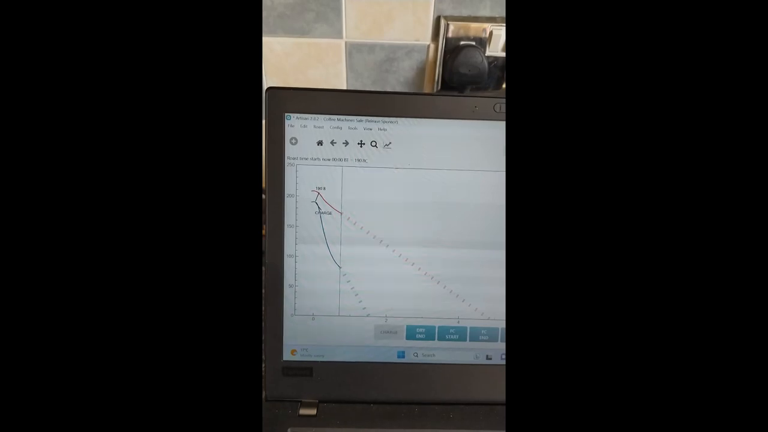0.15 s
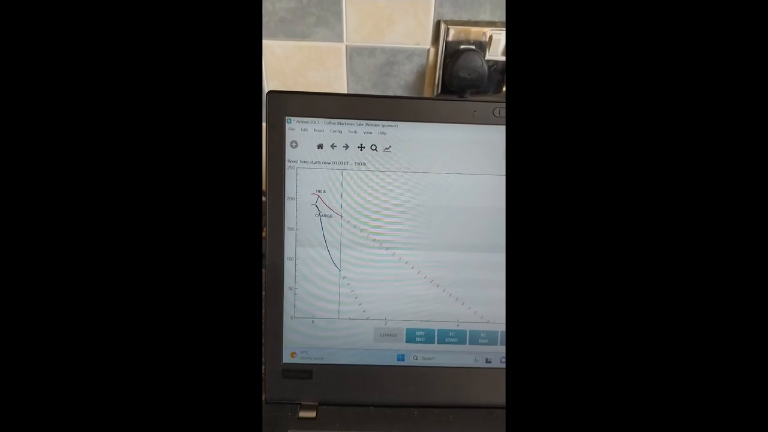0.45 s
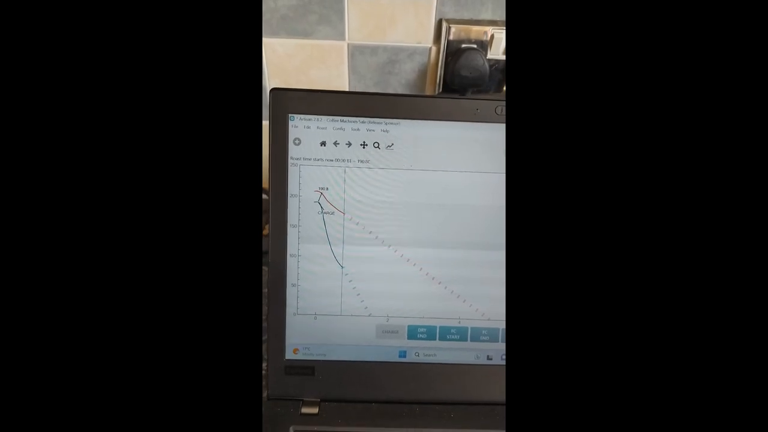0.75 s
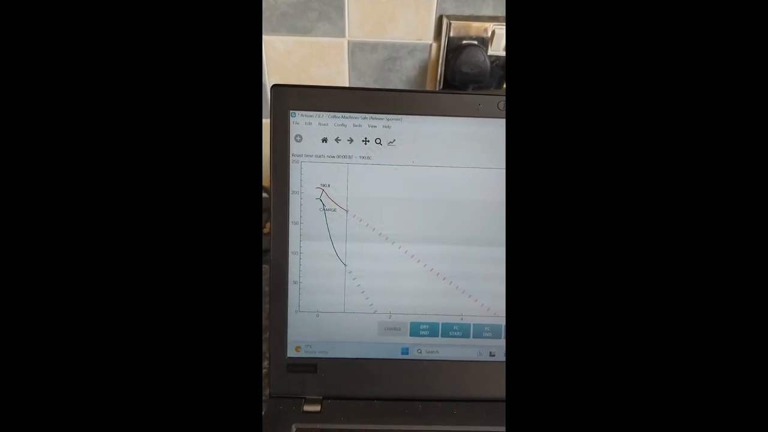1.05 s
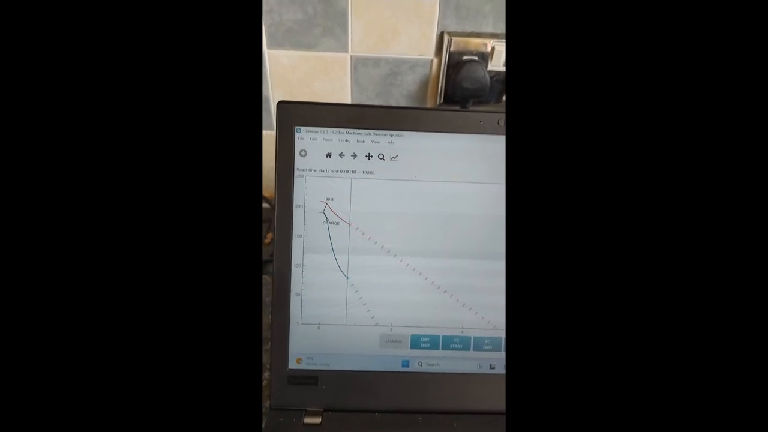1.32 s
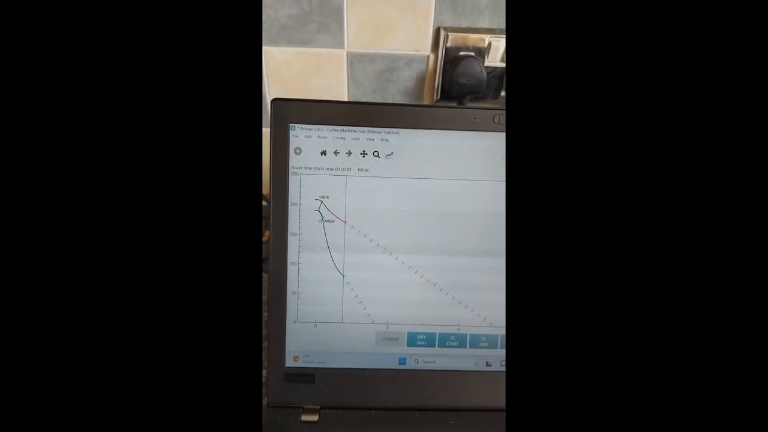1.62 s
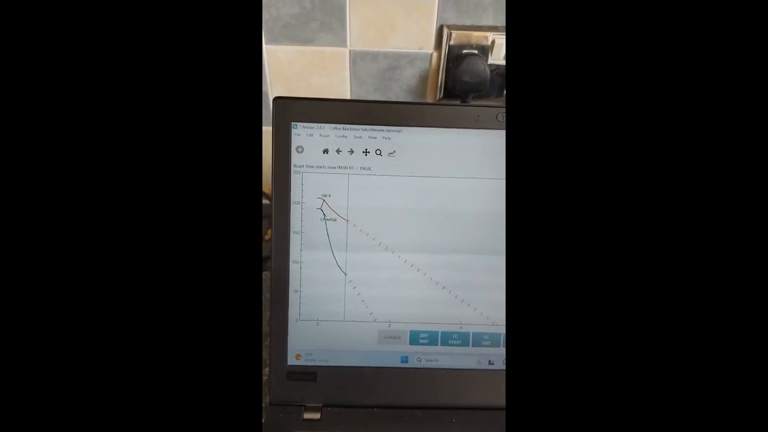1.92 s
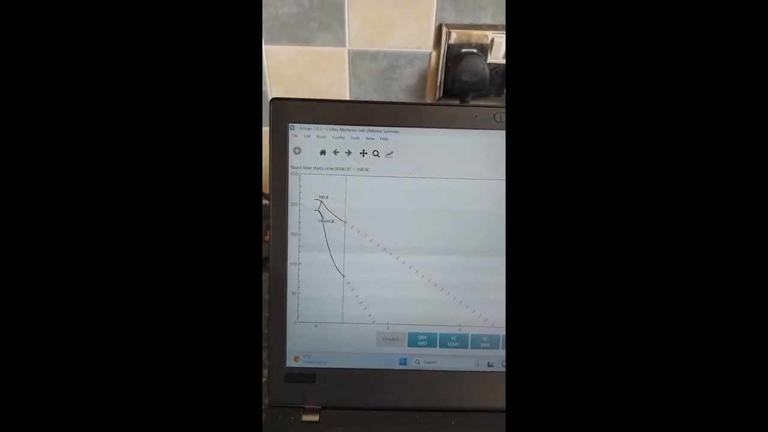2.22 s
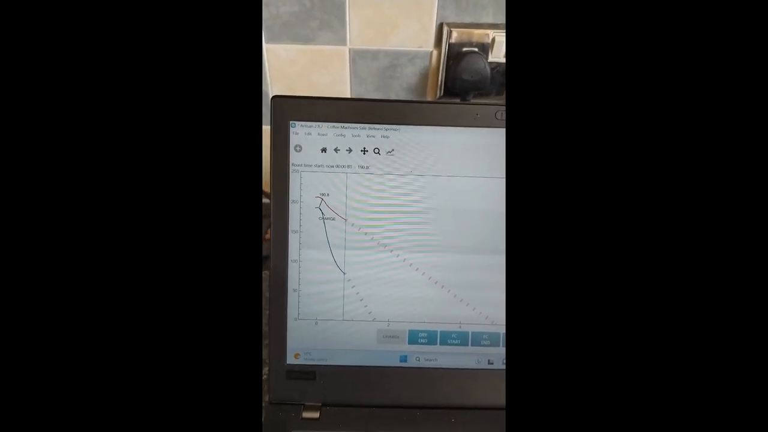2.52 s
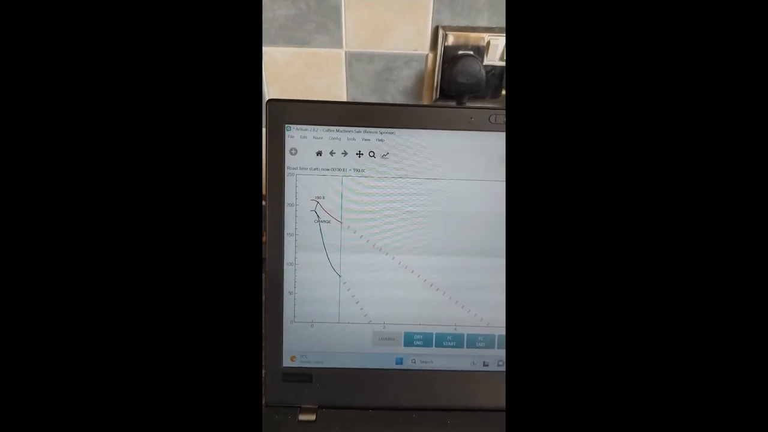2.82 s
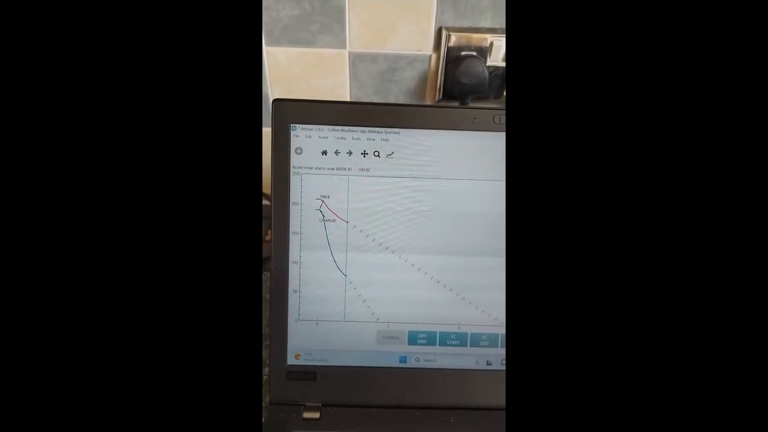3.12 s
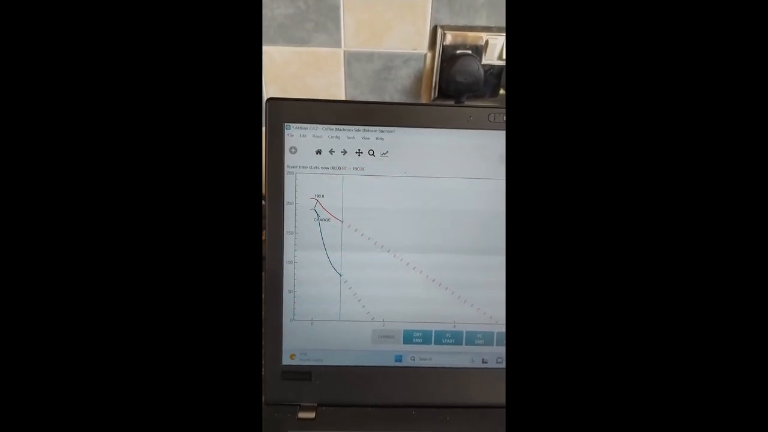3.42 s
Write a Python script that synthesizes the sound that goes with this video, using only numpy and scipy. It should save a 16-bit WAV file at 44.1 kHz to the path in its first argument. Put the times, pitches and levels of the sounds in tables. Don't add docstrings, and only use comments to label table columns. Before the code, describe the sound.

A small roasting drum turns throughout, about 3.5 seconds, already running and never stopping. Bright, dense bean rattles build and quickly fall away every 0.4 seconds, fullest around 1.2 to 1.8, over continuous sliding rustle. Heavier clumps land near 0.25, 0.6, 3.0 and 3.35; sharp steel ticks and tiny high rings scatter throughout. Low, soft fan air with a faint wavering tone sits beneath, in a short bright tiled-room tail.

```python
import sys
import numpy as np
from scipy import signal
from scipy.fft import rfft, irfft
from scipy.io import wavfile

SR = 44100
rng = np.random.default_rng(int(sys.argv[2]) if len(sys.argv) > 2 else 0)


def file_out(sig):
    cols = np.atleast_2d(sig).T
    lim = np.clip(cols, -1, 1)
    pcm = np.round(lim * 32767).astype(np.int16)
    wavfile.write(sys.argv[1], SR, pcm)


def ratio_of_db(decibels):
    return 10 ** (np.asarray(decibels, float) / 20)


N = 156555


def unit(x):
    return x / np.sqrt(np.mean(x ** 2) + 1e-20)


def at_hz(points, hz, axis=1):
    points = np.array(points)
    return np.interp(np.log(hz + 1), np.log(points[:, 0]), points[:, axis])


def colour(x, gain):
    return irfft(rfft(x) * gain(np.arange(N // 2 + 1) * SR / N), N)


def drift(rate):
    r = np.exp(-80 * np.pi * rate / SR)
    slow = signal.lfilter([1], [1, -2 * r, r * r], rng.standard_normal(N // 40 + 2002))[2000:]
    return np.interp(np.arange(N) / 40, np.arange(len(slow)), unit(slow))


def resonate(x, hz, width_hz):
    r = np.exp(-np.pi * width_hz / SR)
    top = np.array([1, 0, -1]) * (1 - r * r) / 2
    return signal.lfilter(top, [1, -2 * r * np.cos(2 * np.pi * hz / SR), r * r], x + 1e-18)


# [f/Hz, density/dB per Hz]
AIR = [(22, -5), (60, -9), (88, -13.5), (240, -7.5), (330, -4), (800, 1), (1000, -9.5), (1300, -4.5)]
# [f/Hz, width/Hz, level/dB]
HOUSING = [(156.5, 62, -65.5), (303, 29, -64.5), (388, 125, -64), (461, 55, -62.5), (640, 79, -61),
           (859, 66, -61), (1590, 270, -55)]


def fan_air():
    white = rng.standard_normal((2, N))
    rush = colour(white, lambda hz: ratio_of_db(at_hz(AIR, hz) - 6.6 * np.log2(np.maximum(hz / 1300, 1))))
    air = ratio_of_db(-46 + 0.72 * drift(13)) * unit(rush)
    for hz, width_hz, db in HOUSING:
        hum = resonate(resonate(white, hz, width_hz), hz, width_hz)
        air += ratio_of_db(db + 1.8 * drift(4.6)) * unit(hum)
    return air


# [f/Hz, level/dB]
BLADES = [(574.5, -58), (1722, -56)]


def fan_blades():
    turns = np.cumsum(1 + 0.00092 * drift(3.0)) / SR
    tones = np.zeros(N)
    for hz, db in BLADES:
        tones += ratio_of_db(db + 2 * drift(12.0)) * np.sqrt(2) * np.sin(2 * np.pi * hz * turns)
    return tones


# [f/Hz, correlation]
LIKENESS = [(60, 0.3), (180, 0.75), (550, 0.48), (1650, -0.23), (4970, 0.04), (15000, -0.05)]


def fan():
    def likeness(hz):
        return np.clip(at_hz(LIKENESS, hz), -1, 1)

    air = fan_air()
    mid = colour(air[0], lambda hz: np.sqrt(1 + likeness(hz)))
    side = colour(air[1], lambda hz: np.sqrt(1 - likeness(hz)))
    return mid + side * np.array([[1], [-1]]) + fan_blades()


# [t/s, f/Hz, level/dB, length/s, left-right/dB]
RINGS = [(.565, 9290, -27, 0.021, 11), (.61, 9290, -32, .015, 4), (0.732, 7150, -29.5, 0.02, 19),
         (1.04, 7180, -30, 0.026, 12), (1.13, 7110, -39, 0.018, 9), (1.4, 6330, -39, .02, 4),
         (1.737, 9290, -26, 0.023, 12), (2.248, 7150, -29, 0.017, 13), (2.57, 8600, -29, 0.024, 15),
         (2.694, 7110, -28, 0.016, 16), (2.9, 9290, -30, .025, 2), (3.339, 6720, -32, .02, 17),
         (3.382, 7150, -28, 0.019, 14), (3.399, 9690, -25, 0.028, -2), (2.633, 2120, -41.5, .05, 4),
         (0.605, 870, -40, 0.024, -7), (2.7, 640, -38.5, 0.016, -4)]


def rings():
    fade_s = 0.021
    t, out = np.arange(N) / SR, np.zeros((2, N))
    for s, hz, db, length, pan_db in RINGS:
        shape = np.clip(np.minimum(t - s, s + length - t) / fade_s + .5, 0, 1)
        sides = ratio_of_db(db + np.array([[.5], [-.5]]) * pan_db)
        out += sides * shape * np.sqrt(2) * np.sin(2 * np.pi * hz * t)
    return out


# [t/s, peak level/dB, left-right/dB]
TICKS = [(0.121, -5, 3.5), (0.2328, -18, 4.0), (0.4318, -10, 4.0), (0.5155, -19, 2), (0.6114, -12, 1),
         (0.6294, -22, 2.0), (1.3143, -10, 5.0), (1.6585, -12, 3.5), (1.8334, -6, 3.5), (1.8616, -8, 5.0),
         (2.1007, -5, 3.0), (2.242, -6, 3.5), (2.555, -13, 4.5), (2.7845, -4, 4.0), (2.98, -3, 5),
         (3.212, -18, 3.0), (3.294, -11, 3.5), (3.2984, -8, 3.0), (3.3861, -7, 3.5)]


def ticks():
    level_db, loudest_db, ring_hz, width_hz = -7, -10, 7900, 1200
    out = np.zeros((2, N))
    for s, db, pan_db in TICKS:
        out[:, int(s * SR)] = ratio_of_db(min(db, loudest_db) + level_db + np.array([.5, -.5]) * pan_db)
    return resonate(out, ring_hz, width_hz) * SR / (np.pi * width_hz) + 0.24 * out


def room(x, count=8):
    t60_s, room_db, left_lag_s = 0.14, 10, .00018
    path_s = .06
    t, out = np.arange(SR // 2) / SR, 0
    place = np.arange(N) / SR / path_s
    for k in range(count):
        tail = rng.standard_normal((2, len(t))) * ratio_of_db(-60 * t / t60_s) * (t > .001)
        tail *= ratio_of_db(room_db) / np.sqrt(np.sum(tail ** 2, axis=1, keepdims=True))
        away = np.abs((place - k + count / 2) % count - count / 2)
        fed = x * np.cos(np.pi / 2 * np.minimum(away, 1))
        out = out + irfft(rfft(fed) * rfft(tail, N), N)
    direct = np.array([np.roll(x, int(left_lag_s * SR)), x])
    return (direct + out) / np.sqrt(1 + ratio_of_db(2 * room_db))


# [f/Hz, width/Hz, left depth/dB, right depth/dB]
THIN_BANDS = [(2560, 71, 3, -8), (3280, 300, 7, 4), (3524, 187, 14.5, 14), (4610, 100, -1, 5),
              (5050, 230, 10, -6), (5370, 190, 14, -1), (5960, 140, 10, -9), (6160, 130, 1, 5),
              (2900, 170, 0, 6), (4170, 134, -8, 0), (9340, 170, 8, -9), (10690, 500, 10, 11),
              (11180, 250, -1, -4), (11850, 480, 13, -4), (12200, 440, 8, 9), (14000, 250, 3, 9),
              (13250, 200, 0, 2), (13400, 320, 1, 10), (14500, 600, 5, 20)]
# [t/s, length/s, f/Hz]
DEEP_DIPS = [(.08, .12, 11850), (.13, .05, 14350), (.3, .1, 10700), (.4, .2, 12150), (.58, .04, 3200),
             (.82, .08, 11850), (.82, .08, 12150), (.85, .03, 3200), (1.19, .04, 11850), (1.27, .03, 2900),
             (1.05, .06, 2620), (1.5, .08, 11850), (1.62, .04, 3200), (1.68, .1, 12150), (1.72, .04, 11250),
             (1.6, .05, 14350), (1.975, .06, 2900), (1.975, .06, 3200), (2.0, .04, 5000), (2.05, .08, 5850),
             (2.29, .04, 6150), (2.3, .025, 2900), (2.32, .04, 5000), (2.355, .045, 3500), (2.47, .05, 5850),
             (2.66, .04, 5380), (2.74, .06, 3200), (2.76, .025, 2620), (2.925, .03, 3200), (2.94, .1, 5380),
             (2.95, .06, 5000), (3.0, .12, 3500), (2.9, .08, 12150), (2.9, .06, 11250), (3.135, .03, 3200),
             (3.165, .04, 5000), (3.12, .05, 11850), (3.23, .06, 4550), (3.26, .04, 2620), (3.36, .06, 5380),
             (3.37, .06, 10700), (3.36, .1, 14350)]


def thin_out(x):
    flicker_db, flicker_per_s, own_share, closed_db = 7, 9, .4, 18
    t = np.arange(N) / SR
    for hz, width_hz, *depth_db in THIN_BANDS:
        common = drift(flicker_per_s)
        own = np.array([drift(flicker_per_s), drift(flicker_per_s)])
        swing = common + own_share * own
        closed = np.zeros(N)
        for s, length, at in DEEP_DIPS:
            if abs(at / hz - 1) < .012:
                closed += np.exp(-(2 * (t - s) / length) ** 4)
        flicker = np.maximum(np.c_[depth_db] / 2 + flicker_db * swing * np.abs(swing), 0)
        share = 1 - ratio_of_db(-closed_db * closed - flicker)
        for side in (-1, 1):
            x = x - share * resonate(x, hz + side * width_hz / 4, width_hz / 2)
    return x


# [f/Hz, gain/dB, left-right/dB]
PORTS = [(100, -3, 1), (1320, 0.44, 0.1), (6080, -0.05, 3.5), (6375, 6.5, 2.5), (8600, 11, 6.5),
         (9900, 7.5, -1), (10500, -2.5, -2), (12500, -8, 5.5), (15200, -19.5, 16)]


def port_db(hz, axis=1):
    return at_hz(PORTS, hz, axis)


def beans(per_s, spectrum, clump_db, surge_db, width_hz, count=48):
    sizes = ratio_of_db(3.0 * np.minimum(rng.exponential(1, N), 4)) * rng.choice([-1, 1], N)
    knocks = sizes * (rng.random(N) < per_s / SR)
    pitches = np.linspace(900, 15500, count) * rng.uniform(.97, 1.03, count)
    dealt = rng.integers(0, count, N)
    wall = np.zeros(N)
    for k, hz in enumerate(pitches):
        wall += resonate(knocks * (dealt == k), hz, width_hz) * ratio_of_db(clump_db * drift(38))
    mix = unit(knocks) + unit(wall)
    surging = mix * ratio_of_db(surge_db * drift(32))
    return unit(colour(surging, lambda hz: ratio_of_db(at_hz(spectrum, hz) + port_db(hz))))


# [f/Hz, density/dB per Hz]
SLIDING = [(700, -28), (1300, -25.5), (2200, -16.5), (3300, -15), (3900, -13), (6000, -14), (9000, -12.5),
           (15500, -10.5)]


def sliding_bed():
    return ratio_of_db(-22) * beans(9000, SLIDING, clump_db=2.0, surge_db=0.47, width_hz=210)


# [late by t/s, level/dB, pouring time/s]
CASCADES = [(.001, -3, .09), (0.016, 0.1, 0.14), (0.018, -0.1, 0.11), (0.022, -0.5, 0.1),
            (-0.0033, 2.4, 0.064), (0.0043, 2.3, 0.069), (-0.014, 0.8, 0.063), (0.017, 0.5, 0.12),
            (0.013, 0.7, 0.093), (0.013, 0.3, 0.13), (0.0074, -3.5, 0.077)]
# [t/s, level over the pour/dB]
CLUMPS = [
    (.245, 4),
    (0.617, 4.5),
    (1.02, -5),
    (1.33, -3),
    (1.47, -1),
    (1.86, -6),
    (2.25, -1),
    (2.6, -9),
    (2.985, 0),
    (3.36, 2),
]


def pour():
    turn_s, first_drop_s = 1.168, -0.074
    build_s, build_db, empty_s = 0.25, 11.5, 0.041
    clump_s = 0.0091
    t, flow = np.arange(N) / SR, np.zeros(N)
    for k, (late, db, hold) in enumerate(CASCADES):
        to_end = first_drop_s + k * turn_s / 3 + late - t
        rise_db = -build_db * np.maximum(to_end - hold, 0) / build_s
        flow += ratio_of_db(2 * (db + rise_db)) / (1 + np.exp(np.clip(-4 * to_end / empty_s, -40, 40)))
    for s, db in CLUMPS:
        flow += ratio_of_db(2 * db) * np.exp(-((t - s) / clump_s) ** 2)
    return np.sqrt(flow)


# [f/Hz, density/dB per Hz]
FALLING = [(700, -25), (1300, -24), (2200, -14), (3300, -10.5), (3900, -8), (6000, -10.5), (9000, -14),
           (15500, -6)]


def cascades():
    return ratio_of_db(-21.5) * pour() * beans(5000, FALLING, clump_db=1.5, surge_db=1.5, width_hz=284)


def scene():
    drum = thin_out(room(cascades() + sliding_bed()))
    return drum + ticks() + rings() + fan()


def top_cut(x):
    return signal.sosfilt(signal.butter(12, 15780, fs=SR, output="sos"), x)


# [left/dB, right/dB]
TOP_LOSS_DB = [2, 25]


def record(dry):
    def lean(x, sign, loss_db):
        return colour(x, lambda hz: ratio_of_db(sign * port_db(hz, axis=2) / 2 - loss_db * (hz > 15150)))

    mix = np.array([lean(x, sign, loss_db) for x, sign, loss_db in zip(dry, (1, -1), TOP_LOSS_DB)])
    return top_cut(mix)


dry = scene()
out = record(dry)
file_out(out)
```